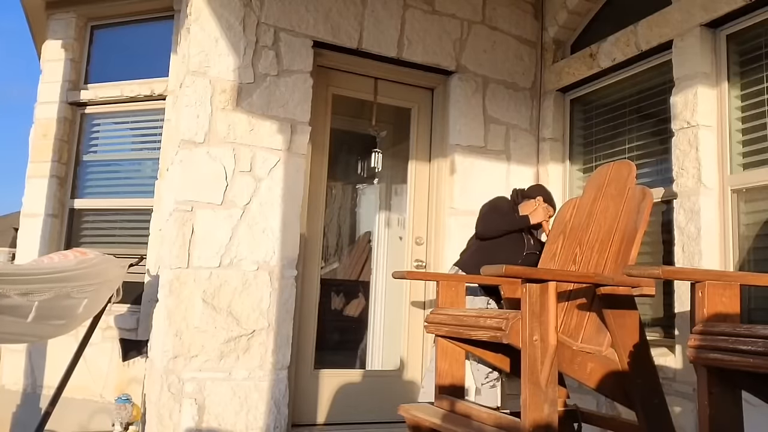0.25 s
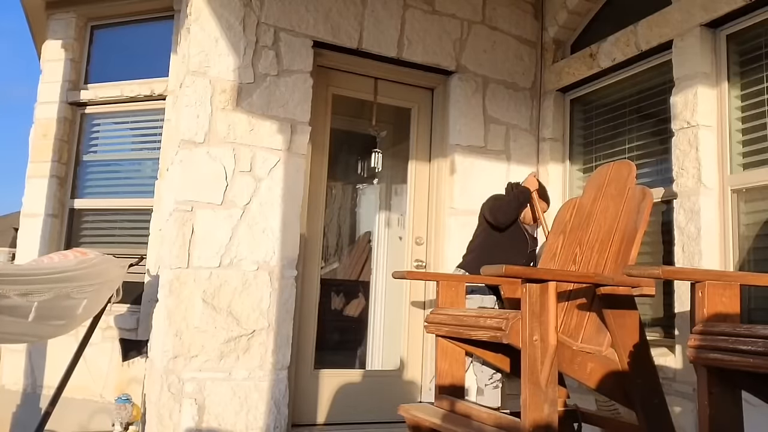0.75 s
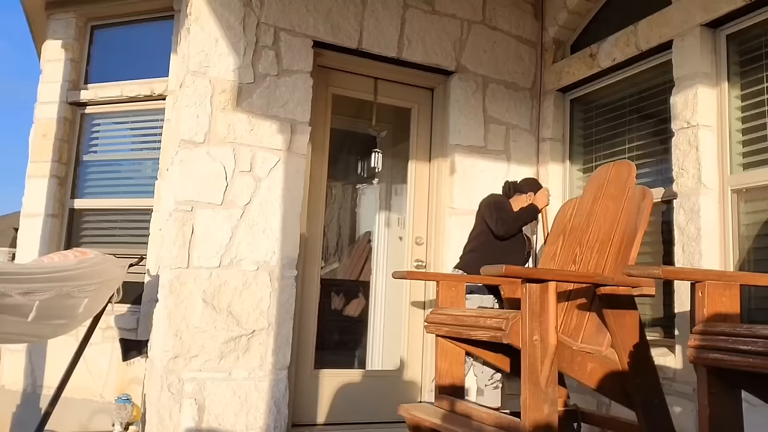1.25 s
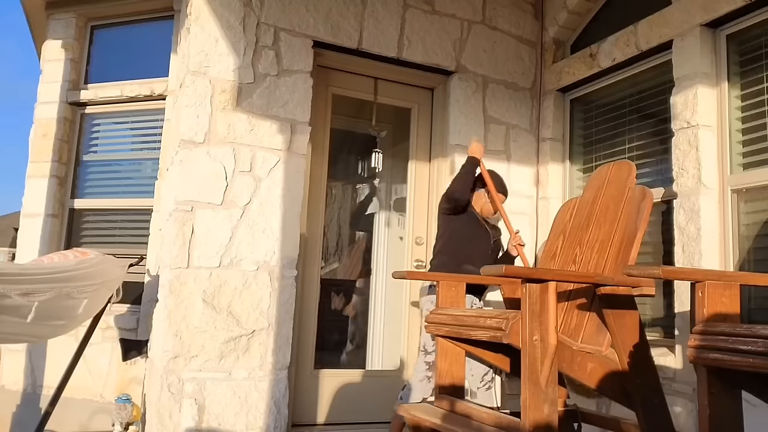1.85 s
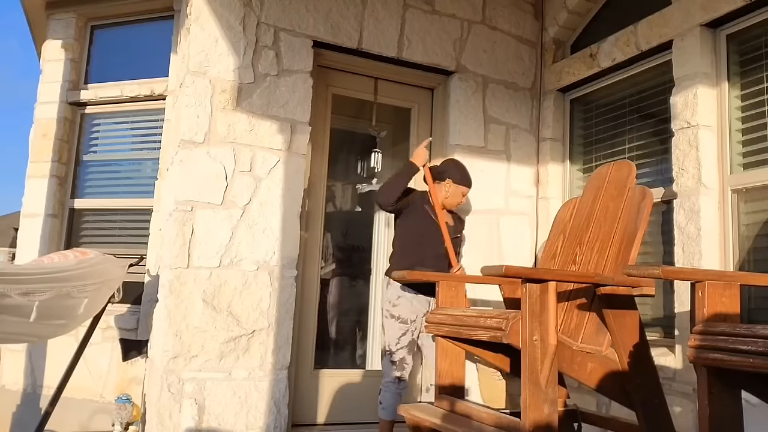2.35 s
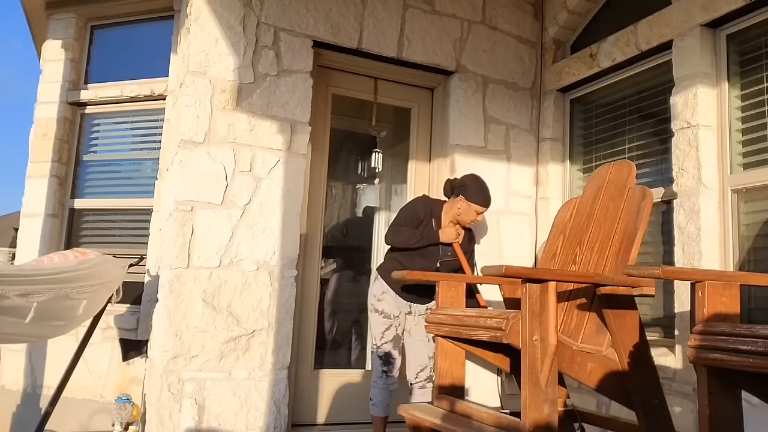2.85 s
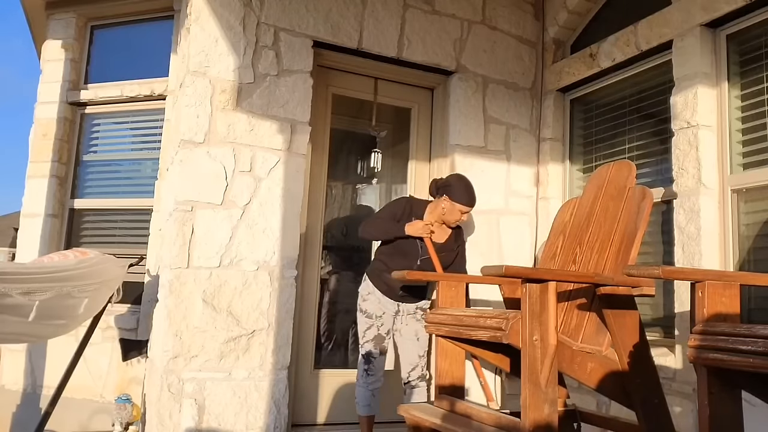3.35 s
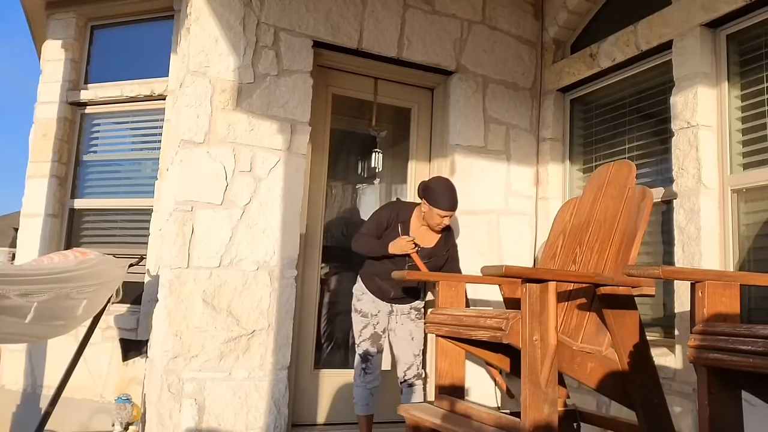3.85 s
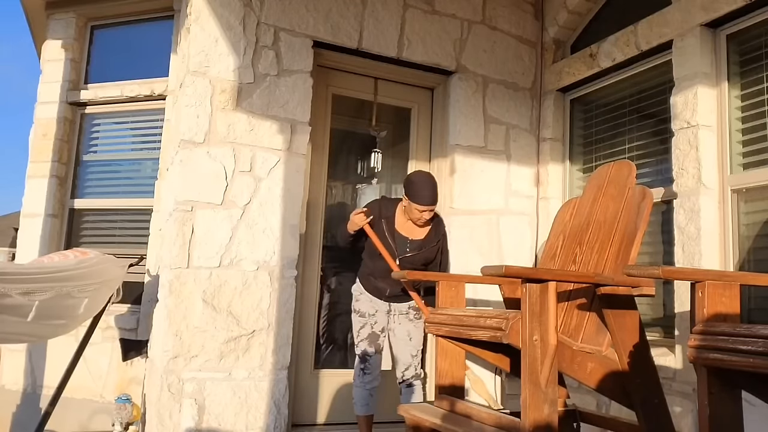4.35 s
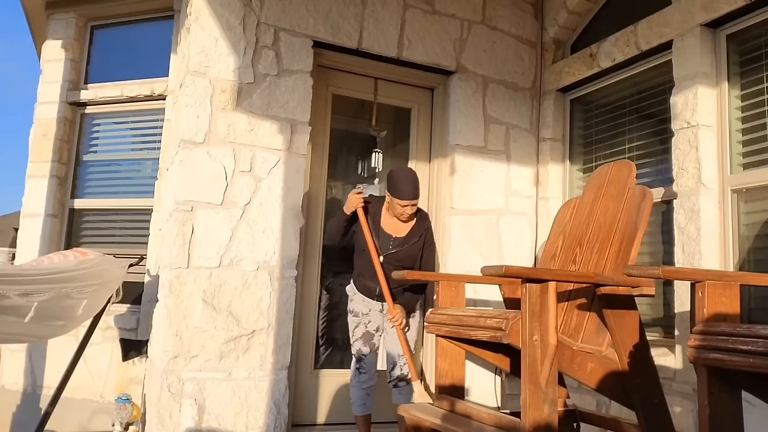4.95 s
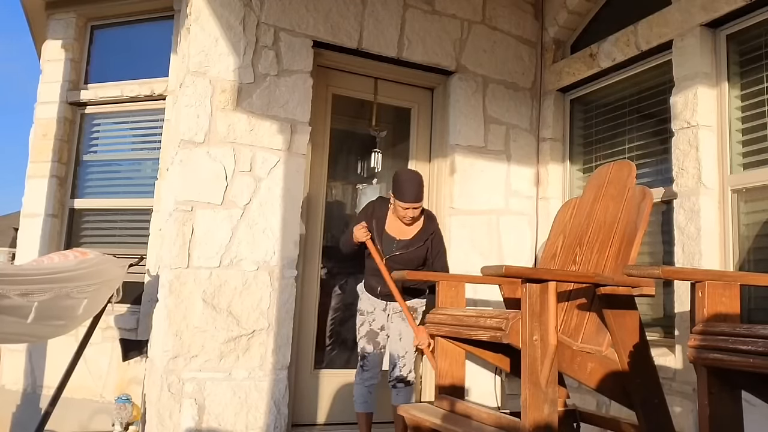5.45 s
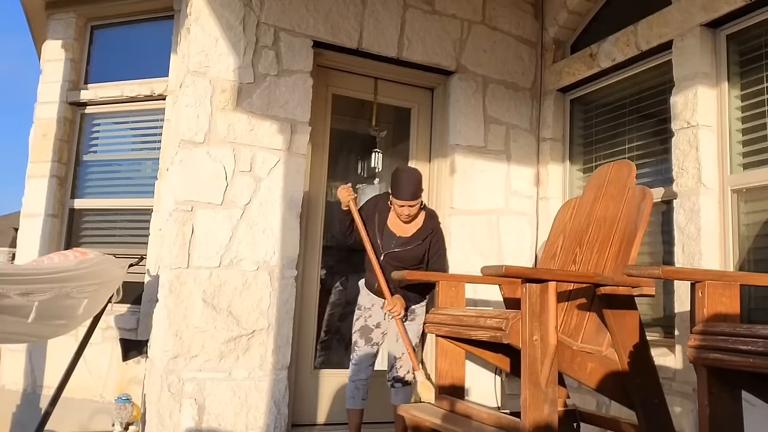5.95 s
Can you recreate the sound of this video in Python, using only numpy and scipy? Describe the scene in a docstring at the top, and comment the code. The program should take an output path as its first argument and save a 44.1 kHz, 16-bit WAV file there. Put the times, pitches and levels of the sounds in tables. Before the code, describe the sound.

A stone porch outdoors, heard in stereo from a few metres. A low, steady engine drone near 90 Hz with lumpy exhaust burble runs throughout, swelling around 0.5 s, wavering, and slowly dropping in pitch. After a nearly silent touch, straw scrapes brightly from 0.4 to 0.7 s while a thin brake squeal sings. Quick swishes follow from 1.0 to 1.7 s, with a hard scuff near 1.1 and a dull wooden knock at 1.3. Lighter brushes come around 2.2 to 2.7 s, a few birds peep, then a sharp scrape and clustered chair knocks near 2.9 s lead into a long soft drag to 3.6. Firm landings at 3.9 and 4.7 s open dry sweeps; another follows at 5.6, and a last scuff at 6.2. Wind thumps from 3.4, heaviest near 4.2 s. Birds twitter after 5 s over faint traffic and rumble.

```python
"""A straw broom sweeps a stone porch floor: dense random ticks shaped by stroke and landing pressure.
Its head bumps a chair now and then, ringing wooden modes, a few metres from a two-port microphone.
An eight-cylinder engine burbles in the street, a firing tone over uneven exhaust pulses, and slows as it leaves.
Puffs of wind thump the microphone as decaying swings; a brake sings and small birds chirp as wavering lines.
Behind them lie a wavering hum and filtered noise for traffic and rumble."""
import sys
import numpy as np
from scipy import signal
from scipy.fft import rfft, irfft, next_fast_len
from scipy.io import wavfile
from scipy.ndimage import uniform_filter1d

SR = 44100
rng = np.random.default_rng(int(sys.argv[2]) if len(sys.argv) > 2 else 0)


def master_out(mix):
    """Clip the mix to full scale and print it as 16-bit PCM to the path in sys.argv[1]."""
    frames = np.transpose(np.atleast_2d(mix))
    ceiling = np.clip(frames, -1, 1)
    pcm = np.round(ceiling * 32767).astype(np.int16)
    wavfile.write(sys.argv[1], SR, pcm)


def boost(x):
    """Linear amplitude factor 10**(x/20) for a level x in decibels (scalar or array-like)."""
    u = np.asarray(x, float) / 20
    return 10 ** u


N = 273861
T = np.arange(N) / SR

# broom strokes: [full pressure t/s, held length/s, start force level/dB, end force level/dB]
SWEEP_STROKES = [(0, 0.18, -77, -75.5), (0.395, .32, -57.5, -53), (1.133, 0.2, -54.5, -58),
                 (1.398, 0.075, -57, -56.5), (1.665, 0.063, -65, -66), (1.983, .19, -81.5, -77.5),
                 (2.496, .18, -67, -68), (2.755, 0.096, -67, -83), (2.914, 0.026, -53, -52),
                 (2.998, 0.62, -64, -61.5), (4.118, 0.2, -64.5, -58), (4.861, 0.26, -57.5, -60),
                 (5.618, 0.25, -62, -57)]
# broom head set down hard: [t/s, force level/dB before the bend of the straws, time to fall 60 dB/s]
HEAD_LANDINGS = [(0.993, -55.5, 0.44), (1.113, -42.5, 0.13), (2.238, -57, 0.091), (3.899, -44.5, 0.41),
                 (4.674, -42, 0.2), (5.531, -61, 0.36), (6.167, -46.5, 0.81)]
# where the broom is: [t/s, left minus right level/dB]
BROOM_PAN = [(0, 2), (2.5, 3), (6.21, 1.5)]
# tone of straw on stone, with the microphone's dip: [f/Hz, relative level/dB]
STRAW_TONE = [(900, -25.5), (1500, -7), (1960, -6.5), (2460, -9), (3180, -4), (4500, -2), (6240, -4),
              (7390, 0.5), (7900, -2.5), (8350, -24.5), (8900, -13), (9600, -12.5), (11700, -7.5),
              (14500, -6.5), (15450, -8), (15700, -41)]
# broom head against a chair leg: [t/s, blow level/dB]
CHAIR_KNOCKS = [(1.335, -53), (2.855, -53), (2.872, -56), (2.969, -62), (3.178, -52)]
# modes of the wood before each blow shifts them: [f/Hz, level/dB against the blow, time to fall 60 dB/s]
WOOD_MODES = [(435, 6.5, 0.023), (777, 1, 0.14), (1244, 1.5, 0.054), (1875, -2, 0.12), (2180, -7, 0.038)]
# engine speed: [t/s, firing rate f/Hz]
FIRING_RATE = [(0, 92.6), (1.6, 92.27), (2, 91.08), (3.6, 90.68), (4.3, 89.47), (5.3, 88.84), (5.75, 85.43),
               (6.21, 86.88)]
# the firing tone swells and sinks: [t/s, mean level/dB]
FIRING_TONE = [(0, -37.5), (.55, -23), (.92, -30), (1.19, -28.5), (1.64, -30.5), (1.8, -27), (2, -36),
               (2.8, -40.5), (2.92, -35), (3.35, -33.5), (3.84, -37), (4.15, -27.5), (4.64, -30),
               (4.96, -28), (5.1, -36), (5.66, -45), (5.81, -33), (6.21, -39.5)]
# burble of the exhaust: [t/s, level/dB before make-up gain]
EXHAUST_BURBLE = [(0, -44.5), (1.7, -46.5), (2.1, -44), (4.2, -42.5), (5.6, -49.5), (6.21, -46)]
# eight cylinders, two banks out of step: [strength above the mean, linear]
CYLINDER_STRENGTH = [1.2, -1.15, -1.55, 1.5, -.2, -.3, .5, 0]
# response of the exhaust pipe: [f/Hz, gain/dB]
PIPE_TONE = [(20, -25), (34, -8), (57, 0), (68, 1), (100, -2), (125, -2), (150, -7.5), (195, -13.5),
             (215, -23), (270, -40), (1000, -130)]
# wind puffs: [t/s, drive level/dB, swing f/Hz, left minus right level/dB]
WIND_PUFFS = [(0.715, -37, 110, -4), (1.765, -30.5, 60, 5), (3.399, -24, 117, -5), (3.491, -21, 156, -16),
              (3.738, -29, 128, -23), (4.166, -12.5, 116, -7.5), (4.207, -25, 111, -22),
              (4.275, -29, 188, -16), (4.309, -18.5, 175, -16.5), (4.937, -21.5, 115, -18),
              (5.587, -26.5, 68.6, 1), (5.861, -26.5, 188, -4), (6.113, -25.5, 87, 2),
              (6.16, -26.5, 57, -7)]
# brake squeals: [full squeal t/s, hold/s, level/dB]
BRAKE_SQUEALS = [(.54, 0.14, -55.5), (1.3, 0.42, -76), (2.1, 0.55, -78)]
# near birds: [t/s, length/s, start f/Hz, end f/Hz, level/dB before the swell of the note]
BIRD_CHIRPS = [(1.954, 0.027, 5780, 6400, -69), (1.96, .047, 6440, 7360, -71),
               (2.583, 0.053, 4420, 4410, -58), (2.596, 0.07, 4100, 4250, -63),
               (4.805, 0.037, 3860, 3670, -66), (5.146, 0.066, 3760, 3785, -64.5),
               (5.197, 0.042, 3380, 3580, -66), (5.294, 0.062, 3410, 3580, -70.5),
               (5.307, .033, 4350, 4700, -77), (5.341, 0.052, 3900, 4080, -71.5),
               (5.424, 0.049, 4435, 4550, -71), (5.447, 0.057, 4100, 4320, -77),
               (5.474, 0.045, 5760, 6250, -73.5), (5.482, .032, 6570, 7050, -69)]
# wavering hum: [t/s, centre f/Hz, mean level/dB]
HUM_LINE = [(0, 650, -73), (1.8, 658, -57.5), (2.5, 665, -66), (3.4, 677, -66), (4.6, 667, -73.5),
            (6.21, 670, -79.5)]
# traffic swells: [t/s, level/dB before make-up gain]
TRAFFIC_LEVEL = [(0, -64), (1.75, -64.5), (2.65, -64.5), (3.2, -61), (3.7, -64), (5.4, -62.5),
                 (6.21, -63.5)]
# tone of the distant street: [f/Hz, relative level/dB]
STREET_TONE = [(130, -17), (220, -5), (273, -1), (467, -14.5), (681, -7), (820, -4.5), (1000, -12.5),
               (1230, -8.5), (1450, -14), (2260, -23), (2660, -30.5), (3300, -29.5), (4480, -44),
               (5500, -39), (7600, -48.5), (8400, -73), (13000, -63), (15500, -64.5), (15800, -96.5)]
# tone of the low rumble: [f/Hz, relative level/dB]
RUMBLE_TONE = [(15, -4.5), (40, 23.5), (70, 24), (130, 9), (200, -17), (300, -47.5), (900, -94.5)]

PORT_LAG = 22  # samples between the ports for sound from the side


def level(x, db=0):
    """Scale to an rms level in dB."""
    return x * boost(db) / np.sqrt(np.mean(x ** 2))


def curves(rows):
    """Columns of a table drawn out as values per sample."""
    s, *columns = np.transpose(rows)
    return [np.interp(T, s, c) for c in columns]


def colour(x, points, causal=True):
    """Filter through (Hz, dB) points; causal by way of the cepstrum of the log gain."""
    size = next_fast_len(N + SR)
    hz, db = np.transpose(points)
    bins_hz = np.arange(size // 2 + 1) * SR / size
    gain = np.interp(np.log(bins_hz + 1), np.log(hz), db) * np.log(10) / 20
    if causal:
        # fold the cepstrum forward in time: minimum phase
        cep = irfft(gain, size)
        cep[1:size // 2] *= 2
        cep[size // 2 + 1:] = 0
        gain = rfft(cep)
    return irfft(rfft(x, size) * np.exp(gain), size)[..., :N]


def band(x, lo_hz, hi_hz):
    """Band-pass."""
    return signal.sosfilt(signal.butter(2, [lo_hz, hi_hz], "band", fs=SR, output="sos"), x)


def noise():
    """White noise for one port."""
    return rng.standard_normal(N)


def walk(rate):
    """Random levels held 1 / rate s and slewed twice; rms 1."""
    hold = int(SR / rate)
    steps = np.repeat(rng.standard_normal(N // hold + 1), hold)
    return level(uniform_filter1d(uniform_filter1d(steps, hold), hold)[:N])


def ports(make, like, lag):
    """Two ports: a shared part that arrives lag samples apart, the rest scattered by the walls."""
    shared = make()
    scattered = np.array([make(), make()])
    return np.sqrt(like) * np.array([shared, np.roll(shared, lag)]) + np.sqrt(1 - like) * scattered


def tone(hz, db, waver_hz, rate):
    """A line that wavers in pitch."""
    phase = 2 * np.pi * np.cumsum(hz + waver_hz * walk(rate)) / SR
    return np.sqrt(2) * np.sin(phase) * boost(db)


def gesture(s, length, rise_db_per_s, fall_db_per_s):
    """Share of the held part gone by, and the gain in dB before and after it."""
    lost_db = rise_db_per_s * np.clip(s - T, 0, None) + fall_db_per_s * np.clip(T - s - length, 0, None)
    return np.clip((T - s) / length, 0, 1), -lost_db


def pressure():
    """Force on the straws: each stroke leans in, swings and lifts off; each landing bends them."""
    press_db_per_s, lift_db_per_s = 227, 257.5  # leaning in, lifting off
    arch_db = 1.5  # extra speed in mid swing
    bend_s = 0.011  # time constant of the straws bending on landing
    force = np.zeros(N)
    for s, length, start_db, end_db in SWEEP_STROKES:
        part, edge_db = gesture(s, length, press_db_per_s, lift_db_per_s)
        swing_db = start_db + (end_db - start_db) * part + arch_db * np.sin(np.pi * part)
        force += boost(swing_db + edge_db)
    for s, db, t60 in HEAD_LANDINGS:
        age = np.clip(T - s, 0, None)
        force += boost(db - 60 * age / t60) * (1 - np.exp(-age / bend_s)) ** 2
    return force


def straw_ticks():
    """Straw tips skipping over stone: noise whose samples differ wildly in size."""
    size_db = 1.6 * rng.exponential(size=N) + 2.22 * walk(150)
    return level(rng.standard_normal(N) * boost(size_db))


def broom():
    """Thousands of straw tips skip over stone: dense ticks of uneven size, smeared by the porch."""
    dull_below_db, dull_slope = -62, 0.35  # light touches lose their top: dB lost per dB under this force
    force = pressure() * boost(0.73 * walk(25.04))  # the stone is uneven
    tips = ports(straw_ticks, 0.33, -3) * force
    tail_t = T[:SR // 4]
    tail = rng.standard_normal((2, len(tail_t))) * boost(-60 * tail_t / 0.09 - 23)
    tips = tips + signal.fftconvolve(tips, tail, axes=1)[:, :N]
    tips = colour(tips, STRAW_TONE)
    top = band(tips, 8600, 17000)
    under_db = np.clip(20 * np.log10(force + 1e-9) - dull_below_db, -30, 0)
    tips += top * (boost(dull_slope * under_db) - 1)
    # undo the overall gain of the colour filter
    unit = np.sqrt(np.mean(colour(noise(), STRAW_TONE) ** 2))
    pan_db, = curves(BROOM_PAN)
    return tips / unit * boost(np.array([pan_db, -pan_db]) / 2 + 2)


def knocks():
    """Dull blows ring the wood's modes, differently each time."""
    out = np.zeros((2, N))
    rattle = walk(250)  # the loose straws roughen the contact
    chances = rng.standard_normal((len(CHAIR_KNOCKS), len(WOOD_MODES)))
    for (s, db), chance in zip(CHAIR_KNOCKS, chances):
        age = np.clip(T - s, 0, None)
        ring = np.zeros(N)
        for (hz, mode_db, t60), c in zip(WOOD_MODES, chance):
            mode = np.sin(2 * np.pi * hz * (1 + 0.046 * c) * age)
            ring += mode * boost(mode_db + 1.1 * c - 60 * age / t60)
        ring *= (1 + 0.61 * rattle) * (1 - np.exp(-age / 0.00082))  # soft contact
        out += ring * boost(db + np.array([[1.5], [-1.5]]))
    return out


def engine():
    """A clean firing tone, and unequal cylinders in a cycle of eight firings through the exhaust."""
    (tone_db,), (burble_db,), (rate_hz,) = curves(FIRING_TONE), curves(EXHAUST_BURBLE), curves(FIRING_RATE)
    firings = np.cumsum(rate_hz) / SR + 7.54
    count = (firings - 0.3).astype(int)  # each puff peaks a little after the crest of the tone
    # every firing also differs at random
    strength = np.array(CYLINDER_STRENGTH)[count % 8] + 0.55 * rng.standard_normal(N)[count]
    fires = np.diff(count, prepend=count[0]) > 0
    puffs = colour(strength * fires, PIPE_TONE, causal=False)
    # the pipe mouth radiates the change of the flow
    burble = level(np.gradient(puffs)) * boost(burble_db + 4.5)
    wall = 0.17 * np.roll(burble, SR // 150)  # an echo off the stone that the ports hear in opposition
    burble = np.array([burble - wall, 1.037 * burble + wall])
    firing_tone = np.sqrt(2) * np.cos(2 * np.pi * firings) * boost(tone_db + 0.7 * walk(10))
    opposed = 0.058 * np.roll(firing_tone, SR // 360) * np.array([[1], [-1]])
    return firing_tone + opposed + burble


def wind():
    """Each puff pushes the membranes once and they swing out, with a flutter of its own on each port."""
    swings = 11.5  # swings until a puff has fallen 60 dB
    out = np.zeros((2, N))
    flutter = level(band(band(rng.standard_normal((2, N)), 40, 320), 29, 430))
    for s, db, hz, pan_db in WIND_PUFFS:
        age = np.clip(T - s + 0.003, 0, None)  # the push starts 3 ms ahead of the listed time
        push = boost(-60 * age * hz / swings) * (1 - np.exp(-age / 0.0032)) ** 2
        swing = np.sin(2 * np.pi * hz * age) + 0.12 * flutter
        out += swing * push * boost(db + np.array([[pan_db], [-pan_db]]) / 2)
    return out


def brake():
    """A squeal that bites, holds and fades: one line near 3296 Hz."""
    bite_db_per_s, fade_db_per_s = 118, 65
    force = np.zeros(N)
    for s, hold, db in BRAKE_SQUEALS:
        _, edge_db = gesture(s, hold, bite_db_per_s, fade_db_per_s)
        force += boost(db + edge_db)
    return tone(3296, 0, 2, 20) * force


def birds():
    """Short gliding notes, a little hoarse with distance; farther birds answer at random."""
    far = []
    for a, b, c in rng.random((22, 3)):
        start_hz = 2900 + 1100 * b
        far.append((5.05 + 1.75 * a, 0.036 + 0.043 * b, start_hz, start_hz + 300 * (c - 0.5), -80 + 6 * c))
    out = np.zeros(N)
    for s, length, from_hz, to_hz, db in list(BIRD_CHIRPS) + far:
        part = np.clip((T - s) / length, 0, 1)
        out += tone(from_hz + (to_hz - from_hz) * part, db, 69, 300) * np.sin(np.pi * part)
    out *= 1 + 0.6 * walk(500)  # hoarseness
    # house fronts blur each note
    echo_t = T[:SR // 8]
    echoes = rng.standard_normal(len(echo_t)) * boost(-60 * echo_t / 0.15 - 28)
    return out + signal.fftconvolve(out, echoes)[:N]


def hum():
    """The traffic's hum: a single line that wavers in pitch and level."""
    return tone(*curves(HUM_LINE), 18, 40) * boost(2 * walk(11))


def traffic():
    """Distant tyres and engines: coloured noise in half-octave bands that flicker alone."""
    growl_db, growl_fade_db_per_s = -60.5, 0.84  # before make-up; the low growl thins as the engine leaves
    brighten_db_per_s = 0.64  # the tyre noise gets brighter as traffic draws near
    hiss = level(colour(ports(noise, 0.3, -PORT_LAG), STREET_TONE))
    traffic_db, = curves(TRAFFIC_LEVEL)
    # the growl follows its own fade in place of the traffic level
    low_db = growl_db - growl_fade_db_per_s * T - traffic_db
    edges = 140 * 2 ** np.arange(0, 7.1, 0.5)
    out = np.zeros((2, N))
    for lo, hi in zip(edges, edges[1:]):
        band_db = 1.17 * walk(14)
        if hi < 570:
            band_db = band_db + low_db
        if hi > 1500:
            band_db = band_db + brighten_db_per_s * (T - 3.5)
        out += band(hiss, lo, hi) * boost(band_db)
    return out * boost(traffic_db + 15)


def rumble():
    """Low street rumble, partly wind on each port, lifted by one gust."""
    gust_s, gust_width_s, gust_db = 4.6, 0.98, 12
    bed = colour(ports(noise, 0.18, 0), RUMBLE_TONE) * boost(2 * walk(4.6))
    lift_db = gust_db * np.exp(-((T - gust_s) / gust_width_s) ** 2)
    return level(bed) * boost(-47.5 + lift_db)


def scene():
    """All sources at the two ports."""
    far = brake() + birds() + hum()
    far = np.array([far, 0.64 * np.roll(far, -PORT_LAG)])  # from the side
    return broom() + knocks() + engine() + wind() + far + traffic() + rumble()


def band_limit(x):
    """A steep low-pass at the top of the band."""
    return signal.sosfilt(signal.butter(12, 16520, fs=SR, output="sos"), x)


def record(dry):
    """The microphones add a faint high hiss of their own."""
    hiss = level(band(rng.standard_normal(dry.shape), 9000, 15500), -91)
    return band_limit(dry + hiss)


dry = scene()
out = record(dry)
master_out(out)
```